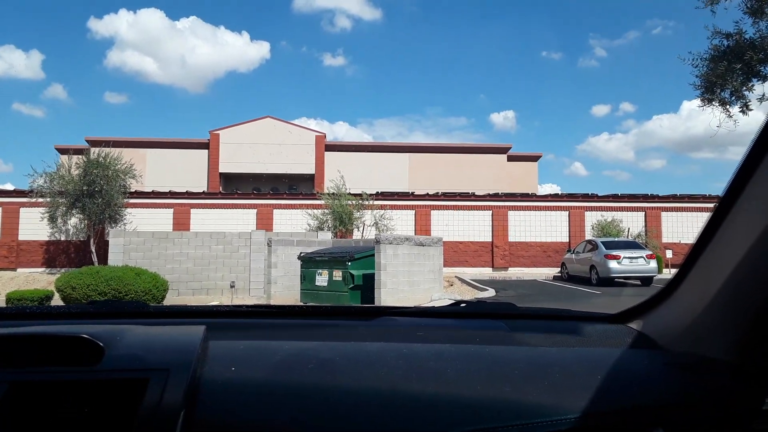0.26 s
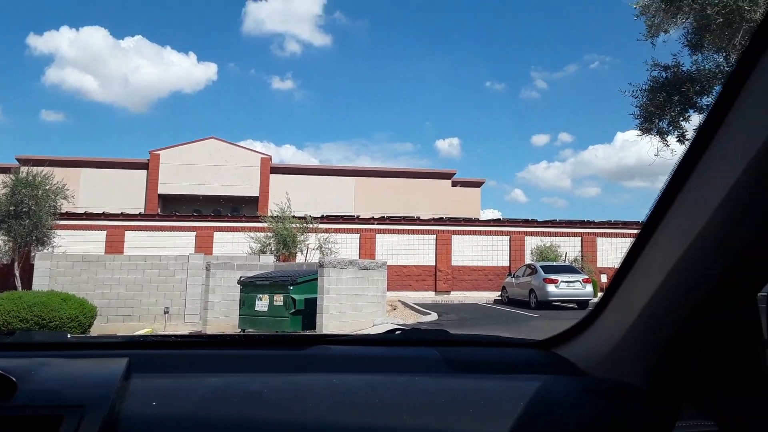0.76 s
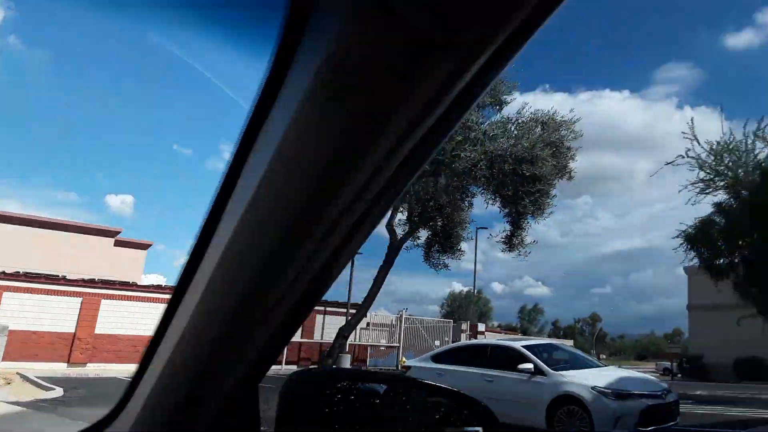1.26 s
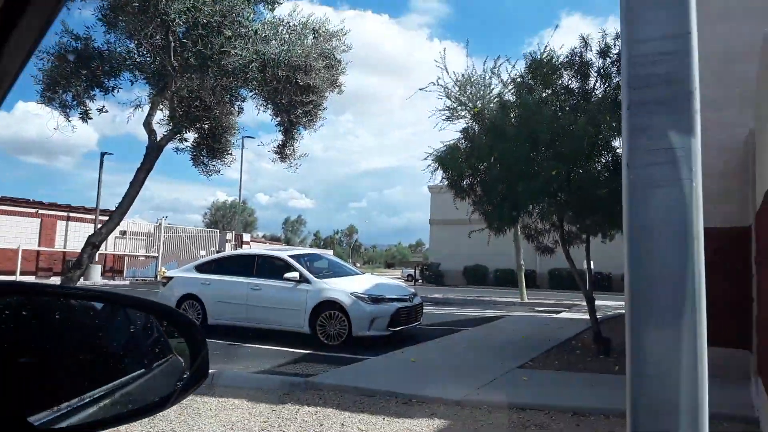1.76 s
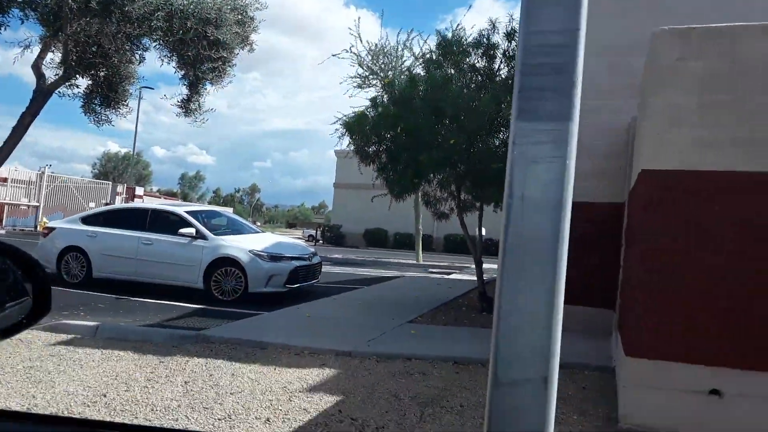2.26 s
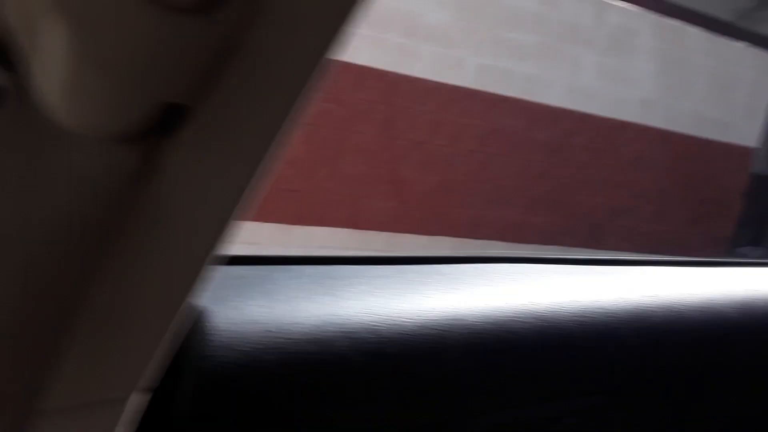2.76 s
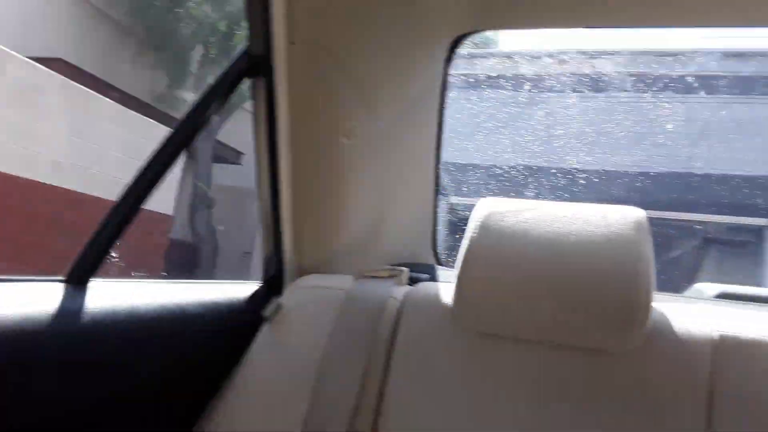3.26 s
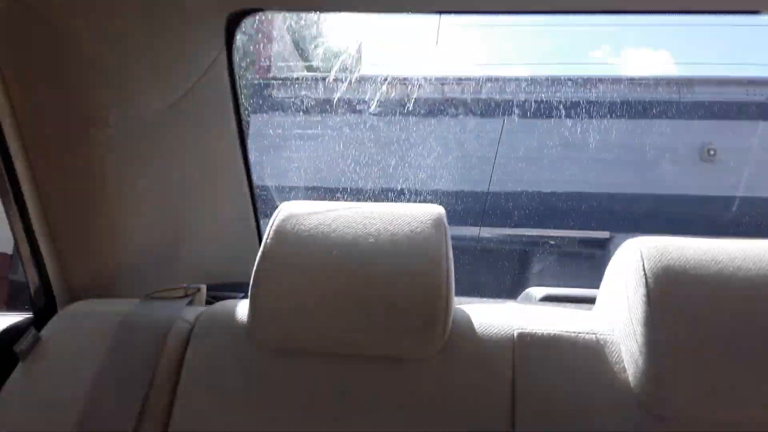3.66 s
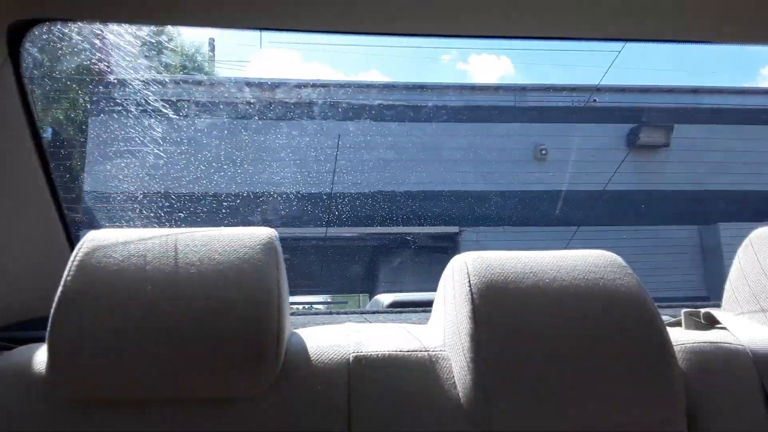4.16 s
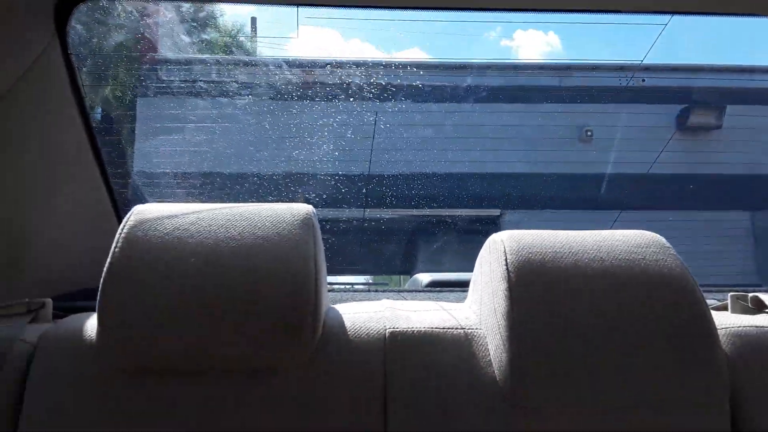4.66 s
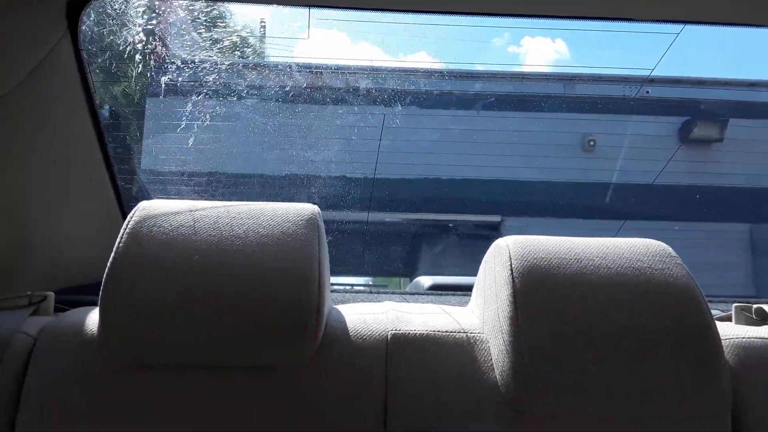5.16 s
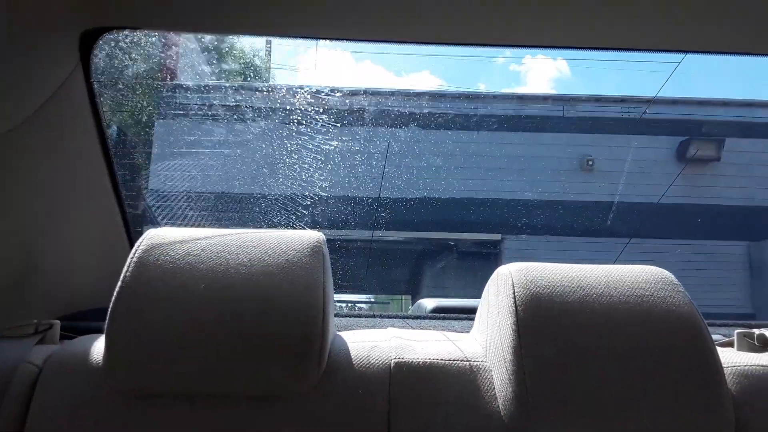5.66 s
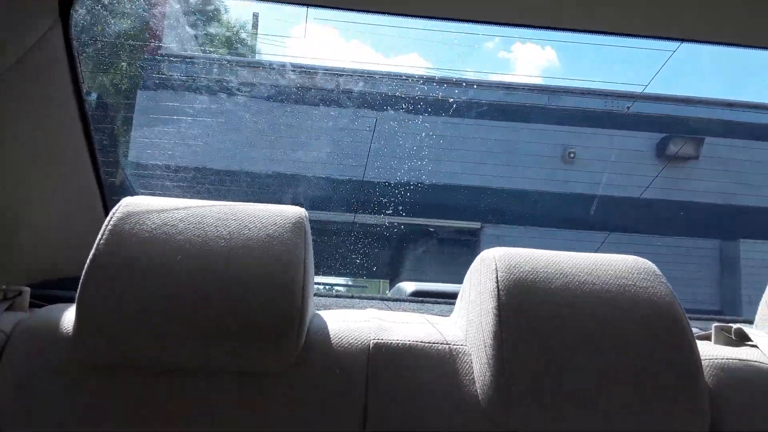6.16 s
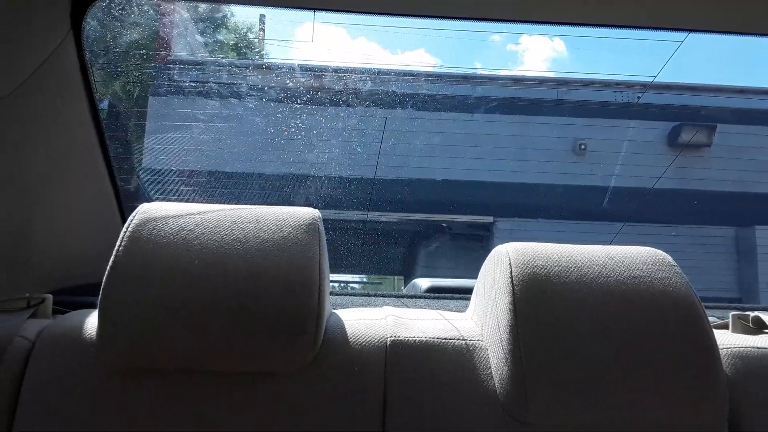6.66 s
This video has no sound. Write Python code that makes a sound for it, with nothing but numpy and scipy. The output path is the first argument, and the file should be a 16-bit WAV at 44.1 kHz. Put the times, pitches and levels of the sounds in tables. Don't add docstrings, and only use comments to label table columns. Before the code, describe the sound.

A steady, loud rushing rumble heard by a stereo phone in a small car cabin. Low air boom wavers irregularly, panels roar and trim buzzes with gusts. Flung water crackles and slaps on glass at first, thinning to stray ticks. The panel roar dips around the middle, then returns with a sharper, ringing airy hiss behind. Near the end the jets fall away, leaving mostly low booming.

```python
import sys
import numpy as np
from scipy import signal
from scipy.fft import rfft, irfft, next_fast_len
from scipy.io import wavfile
from scipy.ndimage import uniform_filter1d, map_coordinates

SR = 44100
rng = np.random.default_rng(int(sys.argv[2]) if len(sys.argv) > 2 else 0)


def dump(signal):
    limited = np.clip(np.atleast_2d(signal).T, -1, 1)
    pcm = np.round(limited * 32767).astype(np.int16)
    wavfile.write(sys.argv[1], SR, pcm)


def gain_from_decibels(decibels):
    exponent = np.asarray(decibels, float) / 20
    return 10 ** exponent


N = 304731

# t/s, level/dB
JET_NEARNESS = [(0, 0), (.75, -1), (1.0, -2.5), (1.4, -2.5), (2.3, -3), (2.8, -2), (3.3, 0), (3.6, -0.5),
                (4.0, -1.5), (4.7, -1.5), (5.2, -3.5), (5.7, -5.5), (6.3, -7), (6.9, -8)]
# t/s, share/0-1
FACING_REAR = [
    (0, 0),
    (1.0, 0),
    (2.2, 0.06),
    (2.47, 0.22),
    (2.62, 0.37),
    (3.0, 0.6),
    (3.6, 0.95),
    (6.91, 0.99),
]
# t/s, level/dB
PRESSURE = [(0, -2), (.3, 0), (.9, -0.5), (1.47, -0.5), (1.58, -5), (1.8, -6), (2.4, -5), (2.6, -5),
            (3.1, -3), (3.5, 0), (4.2, -1), (4.45, -2.5), (5.0, -2.5), (5.5, -3), (6.9, -2.5)]
# t/s, length/s, rise/dB
GUSTS = [(.01, .03, 4.5), (.16, 0.024, 1.5), (.45, 0.074, 1.5), (.64, 0.038, 5), (.71, .04, 4.5),
         (.76, 0.011, -3), (.87, 0.048, -2), (.98, .04, -1), (.27, 0.039, -1), (4.38, 0.046, 0.5),
         (2.36, 0.057, -1), (3.3, .04, 1), (3.7, 0.035, 0.5), (4.25, 0.033, 0), (5.75, .06, 0.5),
         (6.1, .08, 0.5), (6.8, 0.07, -0.5), (1.29, 0.038, -2), (1.06, 0.058, 3), (1.18, 0.076, 4.5),
         (1.43, 0.056, 5.5), (1.64, 0.019, 3.5), (1.95, 0.11, 1.5), (2.14, 0.043, 2), (2.72, 0.14, 3),
         (3.13, 0.031, 0.5), (3.47, 0.046, 1), (3.87, .04, 0), (4.1, .08, 1.5), (4.62, 0.11, 1.5),
         (4.78, 0.039, 1.5), (4.95, 0.088, 1), (5.35, .06, 1), (6.55, 0.14, 1)]
# t/s, left minus right/dB
PANEL_LEAN = [(0.01, 0), (0.72, 0.5), (1.35, -0.5), (6.44, 0.5), (6.9, 0.5)]
# t/s, left minus right/dB
JET_LEAN = [(0, 0.5), (1.6, -1.5), (2.0, -1), (2.5, -2.5), (2.8, 0), (3.3, 0.5), (4.5, -1), (5.2, -1),
            (6.9, -1)]
# f/Hz, facing front/-1..1, facing rear/-1..1
LIKENESS = [(60, 1, 0.98), (110, 0.99, 0.93), (180, 0.93, 0.8), (260, 0.85, 0.83), (447, 0.76, 0.91),
            (597, 0.5, 0.31), (780, 0.68, 0.51), (913, 0.21, -0.23), (1028, -0.18, 0.013),
            (1213, 0.21, -0.63), (1460, -0.1, -0.4), (1650, -0.26, -0.49), (2035, -0.18, 0.14),
            (2400, 0.16, 0.26), (3020, -0.21, -0.32), (3650, 0.035, 0.0042)]

# f/Hz, left level/dB per Hz, right level/dB per Hz
FAINT_HISS = [(7300, -20, -20), (7800, -2, -1), (10000, -2, -6), (13000, 2, 2), (16000, -4, -4)]
# f/Hz, level/dB per Hz
FLOOR_SHAKE = [(15, -20), (25, -15), (40, -8), (52, 3), (65, -9)]
# f/Hz, level/dB per Hz
BOOM_LENGTHWISE = [(35, -36), (48, -35), (60, -1.5), (75, 2.5), (88, 13), (100, -4), (125, -28)]
# f/Hz, level/dB per Hz
BOOM_CROSSWISE = [(70, -53), (90, -27), (103, -4), (120, 3), (132, 0), (150, -38)]
# f/Hz, level/dB per Hz
BOOM_UPRIGHT = [(115, -36), (132, -2), (150, 0.5), (170, -3.5), (190, -7.5), (215, -19.5), (300, -61)]
# t/s, rise/dB
EDDIES_LENGTHWISE = [(.14, 5), (.47, 6), (.95, 10), (1.25, 12.5), (1.9, 5), (2.14, 3), (2.6, 6), (2.9, 9.5),
                     (3.2, 9), (3.5, 8), (3.75, 5), (4.06, 7.5), (4.25, 2.5), (4.6, 8), (5.05, 8.5),
                     (5.2, 5), (5.55, 5), (5.7, 0), (5.9, 8), (6.17, 4), (6.35, 3), (6.76, 6.5)]
# t/s, rise/dB
EDDIES_CROSSWISE = [(.1, 6.1), (.43, 6), (.82, 4.6), (.94, 11.3), (1.2, 7.3), (1.42, 9.4), (1.57, 11),
                    (2.08, 7.1), (2.5, 1.7), (2.87, 3.1), (3.12, 6.3), (3.3, 6.8), (3.58, 6.8), (3.98, 4.5),
                    (4.14, 3), (4.38, 3.5), (4.68, 3.4), (4.92, 7.9), (5.17, 6.2), (5.62, 9.4), (5.77, 1.8),
                    (6.09, 13.5), (6.25, 7.7), (6.47, 4.3), (6.88, 3)]
# t/s, rise/dB
EDDIES_UPRIGHT = [(.02, 3.3), (.2, 2), (.3, 2.3), (.43, 3.5), (3.4, 4.1), (.64, 5.5), (.93, 1.7),
                  (1.13, 6.4), (1.7, 5.4), (1.88, 2.5), (2.1, 6.4), (2.6, 0.92), (2.87, 3.3), (3.25, 3.7),
                  (3.55, 5.2), (3.75, 1.7), (4.15, 7.2), (4.65, 3.7), (4.9, 2.1), (5.1, 5.6), (5.45, 5.4),
                  (5.62, 4), (5.8, 1.3), (6.14, 3), (6.3, 4.8), (6.55, 3.3), (6.88, 1.4)]
# f/Hz, level/dB per Hz
PANE = [(165, -21), (185, 1), (210, -1.5), (240, -3), (275, -7.5), (310, -30)]
# t/s, rise/dB
EDDIES_PANE = [(.07, 9), (.35, 9), (.65, 5), (.95, 0), (1.2, 13), (1.42, 11), (1.6, 4.5), (1.9, 6),
               (2.17, 10.5), (2.35, 4.5), (2.55, 3.5), (2.75, 6.5), (3.2, 7), (3.5, 8), (3.7, 8), (3.95, 7),
               (4.25, 8), (4.45, -0.5), (4.85, 9.5), (5.05, 2), (5.45, 7), (5.8, -5), (6.2, -1), (6.45, -4),
               (6.8, -2)]

# facing front level/dB, facing rear level/dB, growth with pressure/dB per dB, growth with gust/dB per dB
BODY_ANSWER = dict(roar=(-20.5, -20, 1.46, 1), buzz=(-30, -29, 0.94, 1), deep=(-33, -26, 0.4, -0.2),
               lower=(-24.5, -26, 0.5, .5), upper=(-19, -22, 1.05, 0.35))
# f/Hz, level/dB per Hz
ROAR_FRONT = [(170, -43), (212, -13), (262, -1.5), (310, -3.5), (400, -4.5), (500, -9), (560, -61)]
# f/Hz, level/dB per Hz
ROAR_REAR = [(170, -31), (212, -2), (248, -1.5), (320, -4), (430, -5), (500, -10.5), (560, -23.5)]
# f/Hz, level/dB per Hz
BUZZ_FRONT = [(460, -31), (520, 0.4), (640, -4.5), (800, -10), (950, -17), (1200, -33)]
# f/Hz, level/dB per Hz
BUZZ_REAR = [(460, -12), (520, -0.8), (620, -4), (720, -3.5), (900, -13), (1200, -39)]
# t/s, length/s, rise/dB
BUZZ_SURGES = [
    (.7, .08, 1),
    (.9, .06, 2.5),
    (1.7, 0.11, -2),
    (2.2, 0.22, -2),
    (2.9, .08, 1),
    (4.3, .1, -1.5),
    (5.8, 0.067, -0.5),
    (5.98, 0.067, 1),
    (6.4, 0.074, 0),
]

# f/Hz, width/Hz, left level/dB, right level/dB
SEAL_GAPS = [
    (7055, 90, -49, -63),
    (9460, 90, -57, -75),
    (8850, 100, -66, -69),
    (5260, 110, -63, -56),
    (10130, 50, -68, -76),
    (10710, 60, -66, -76),
    (6680, 200, -50, -66),
    (4400, 700, -56, -47),
    (5000, 500, -60, -49),
    (5600, 900, -52, -52),
]
# start t/s, loudest t/s, end t/s
SEAL_PASSES = [
    (2.6, 4.6, 5.6),
    (2, 3.2, 5.4),
    (4.0, 4.9, 5.6),
    (3, 4.4, 6.9),
    (3.2, 4, 5.8),
    (2.9, 4.3, 5.4),
    (3.1, 3.0, 3.4),
    (2.5, 2.7, 3.2),
    (3, 3.4, 3.7),
    (5.4, 5.8, 5.9),
]
# t/s, length/s, fizz level/dB
SPRAY = [(0.017, .02, -51), (.093, .008, -58), (0.12, .008, -58), (0.283, .008, -54), (0.403, .012, -52),
         (0.487, .012, -58), (0.138, 0.022, -58), (0.33, .03, -62), (0.419, 0.022, -46),
         (0.451, 0.014, -42.5), (.478, 0.016, -53), (.512, 0.012, -51), (0.54, .01, -57),
         (0.57, 0.011, -55), (0.615, 0.02, -45), (.652, .015, -58), (0.697, .015, -55), (.722, .012, -50),
         (.77, .01, -60), (0.806, .008, -55), (0.857, 0.01, -58), (0.532, .1, -55), (0.678, .06, -58),
         (.75, .06, -60), (0.903, .012, -54), (1.15, 0.028, -52), (1.225, .012, -57), (1.33, .01, -58),
         (1.416, .03, -62), (1.09, .015, -58), (1.48, .01, -57), (1.535, .006, -57), (1.62, .006, -57),
         (1.757, .006, -54), (1.81, .006, -57), (1.96, .015, -58), (2.303, .006, -54), (2.355, .006, -58),
         (3.015, .006, -52), (3.48, .006, -52), (5.088, .006, -54), (5.815, .006, -56), (2.907, .015, -48),
         (4.264, .015, -48)]
# f/Hz, left level/dB per Hz, right level/dB per Hz
SPRAY_FIZZ = [(2500, -30, -31), (3500, -10, -5), (5000, -13, -4), (7000, 0.5, -13), (8000, -10, -9),
              (10100, -13, -13), (11300, -3, -5), (12700, 0, 0), (14000, -7, -8), (15700, -12, -12),
              (16500, -30, -30)]
# f/Hz, level/dB per Hz
SPRAY_SLAP = [(700, -21), (1050, 15), (1500, 1), (2200, -14), (3000, -16), (4000, -31)]

# facing front level/dB, facing rear level/dB,
# front growth with nearness/dB per dB, rear growth/dB per dB, power bending the turn
JET_ANSWER = dict(rush=(-41.5, -37.5, 1.1, 0.27, 0.85), hiss=(-45.5, -42, 0.94, 0.42, 3),
              fizz=(-61, -46, 1, 1.56, 0.23), ring=(-60.5, -47, -0.8, 1.08, 0.26))
# f/Hz, left level/dB per Hz, right level/dB per Hz
HISS_FRONT = [(760, -31, -37), (1013, 6.5, 1), (1310, -1, 0), (1960, -1, -2), (2720, -6, -9.5),
              (3160, -8, -13), (3640, -4, -13), (4520, -6, -11.5), (4940, -12.5, -15), (5760, -19.5, -21.5),
              (6400, -30, -21)]
# f/Hz, left level/dB per Hz, right level/dB per Hz
HISS_REAR = [(860, 0, 5), (1020, 8.5, 8), (1410, 5, 3), (2040, -3, -3), (2700, -5, -1.5), (3240, -5, -5),
             (3670, -1, -5), (4170, -0.5, -5.5), (4700, -4, -5), (5300, -6.5, -6), (5630, -6, -15),
             (6440, -12.5, -13)]
# f/Hz, left level/dB per Hz, right level/dB per Hz
RING_FRONT = [(5730, -32, -23), (6000, -7.5, -17), (6400, -3, -14), (6830, 4.5, -12), (7370, -3, -3),
              (7630, -22, -11), (7900, -48, -40)]
# f/Hz, left level/dB per Hz, right level/dB per Hz
RING_REAR = [(5700, -24, -20), (6030, -14, -9), (6420, -2, -15), (7100, 5, -10), (7350, -1, -8),
             (7560, -5, -6), (7630, -16, -13), (7900, -40, -40)]
# f/Hz, left level/dB per Hz, right level/dB per Hz
FIZZ_FRONT = [(7400, -30, -30), (7800, -13, -0.5), (8700, -3.5, -4), (10000, -9.5, -10), (11500, -2, -4),
              (12600, 0.5, 0), (14000, -7, -8), (15700, -11, -11), (16500, -30, -30)]
# f/Hz, left level/dB per Hz, right level/dB per Hz
FIZZ_REAR = [(7400, -30, -30), (7800, -6, -4), (8300, -3.5, -3), (8800, -2, -6), (9400, -4, -3.5),
             (10300, -2, -10), (11500, -1, -5.5), (13200, 2, -5), (14500, -5, -11), (15700, -8, -17),
             (16500, -30, -27)]
# t/s, length/s, rise/dB
WATER_SHEETS = [
    (.06, 0.023, 1),
    (.12, .03, 2.5),
    (.32, .03, 1),
    (.415, 0.017, 7),
    (.452, 0.011, 3),
    (.478, .018, 4.5),
    (.78, 0.011, 3.5),
    (.86, .015, 2),
    (.62, 0.026, 0),
    (.74, 0.044, 0.5),
]
# t/s, length/s, rise/dB
HISS_SWELLS = [
    (2.66, .1, 1.5),
    (2.95, 0.15, 3),
    (4.2, .15, 1.5),
    (3.5, .2, -1),
    (4.55, 0.17, 1.5),
    (5.1, 0.14, 0.5),
    (5.6, .12, 0.5),
    (5.95, 0.3, 2),
]
# t/s, length/s, rise/dB
RING_BURSTS = [(2.79, 0.049, 3), (3.0, 0.082, 6), (3.15, 0.075, 2), (3.27, 0.046, 4.5), (3.42, .05, 3.5),
               (3.55, .06, 4), (4.5, 0.073, 0.5), (4.9, 0.089, 2), (3.85, .08, 0.5), (5.15, .08, -0.5),
               (5.75, .1, 1), (6.1, .1, 1.5)]
# t/s, length/s, rise/dB
FIZZ_LULLS = [
    (.2, .12, 0),
    (.37, .03, -1.5),
    (1.0, .06, -2),
    (1.28, .04, 0),
    (2.4, .2, -1.5),
    (2.68, .1, 0.5),
    (3.9, .15, 0.5),
    (4.8, .2, 0),
    (6.1, .25, -0.5),
    (6.6, .2, 0),
]


def unit(x):
    return x / np.sqrt(np.mean(x ** 2) + 1e-20)


def along(points, hz):
    f, *columns = np.transpose(points)
    return np.array([np.interp(np.log(hz + 1), np.log(f + 1), column) for column in columns])


def table(points):
    return lambda hz: gain_from_decibels(along(points, hz)) * (hz >= points[0][0]) * (hz <= points[-1][0])


def curves(rows):
    s, *columns = np.transpose(rows)
    return [np.interp(np.arange(N) / SR, s, column) for column in columns]


def swells(rows, length=None):
    s, *span, rise_db = np.transpose(rows)[..., None].astype(np.float32)
    t = np.arange(0, N + 64, 64, dtype=np.float32) / SR
    bells = np.exp(-((t - s) / (length or span[0])) ** 2)
    coarse = (rise_db * bells).sum(axis=0)
    return np.interp(np.arange(N) / SR, t, coarse)


def wobble(rate, count=N, step=1 / SR, order=3):
    knots = rng.standard_normal(int(count * step * rate) + 4)
    return map_coordinates(knots, [np.arange(count) * step * rate], order=order)


def rush(gain, pose=0, patchy_db=1.5, echo=0.092, comb_db=0.0):
    z = signal.stft(rng.standard_normal((2, N)).astype(np.float32), nperseg=512)[2]
    patches = uniform_filter1d(rng.standard_normal(z.shape[1:]), size=6, axis=0)
    patches = uniform_filter1d(patches, size=12, axis=1)
    pair = signal.istft(z * gain_from_decibels(patchy_db * unit(patches)), nperseg=512)[1][:, :N]

    m = next_fast_len(N + SR // 4)
    hz = np.fft.rfftfreq(m, 1 / SR)
    ripple = np.array([wobble(1 / 130, count=len(hz), step=hz[1], order=1) for _ in range(4)])
    ripple = ripple * np.minimum(hz / 2200, 1) ** 2
    alike = along(LIKENESS, hz)[pose] + echo * (ripple[0] + 1j * ripple[1])

    angle = np.arccos(np.clip(np.abs(alike), 0, 1)) / 2
    mid, side = rfft(pair, m) * [np.cos(angle), np.sin(angle)]
    ports = np.array([mid + side, (mid - side) * np.exp(1j * np.angle(alike))])
    return unit(irfft(ports * gain(hz) * gain_from_decibels(comb_db * ripple[2:]), m)[:, :N])


def turning(front, rear, patchy_db):
    share = np.clip(curves(FACING_REAR)[0], 0, 1)
    ahead = rush(table(front), pose=0, patchy_db=patchy_db, echo=0.086, comb_db=1.6)
    behind = rush(table(rear), pose=1, patchy_db=patchy_db, echo=0.2, comb_db=1.0)
    return np.sqrt(1 - share) * ahead + np.sqrt(share) * behind


def steady(x, span, depth):
    power = np.abs(uniform_filter1d(np.mean(x ** 2, axis=0), size=int(span * SR))) + 0.05
    return unit(x / power ** (depth / 2))


def body_db(part):
    front_db, rear_db, per_pressure, per_gust = BODY_ANSWER[part]
    pose_db = front_db + (rear_db - front_db) * curves(FACING_REAR)[0]
    return pose_db + per_pressure * curves(PRESSURE)[0] + per_gust * swells(GUSTS)


def jet_db(part):
    front_db, rear_db, front_grows, rear_grows, power = JET_ANSWER[part]
    turn = np.clip(curves(FACING_REAR)[0], 0, 1) ** power
    near_db = curves(JET_NEARNESS)[0]
    return (1 - turn) * (front_db + front_grows * near_db) + turn * (rear_db + rear_grows * near_db)


def faint_hiss():
    return gain_from_decibels(-60) * rush(table(FAINT_HISS), patchy_db=0.0)


def floor_shake():
    return gain_from_decibels(-45) * rush(table(FLOOR_SHAKE), pose=0, patchy_db=1)


def cabin_boom():
    deep_db = body_db("deep") + swells(EDDIES_LENGTHWISE, length=0.09)
    lower_db = body_db("lower") + swells(EDDIES_CROSSWISE, length=0.06)
    upper_db = body_db("upper") + swells(EDDIES_UPRIGHT, length=0.049)
    deep = steady(rush(table(BOOM_LENGTHWISE), pose=1, patchy_db=1.0), span=0.11, depth=1.0)
    lower = steady(rush(table(BOOM_CROSSWISE), pose=0, patchy_db=-1.5), span=0.072, depth=0.58)
    upper = steady(rush(table(BOOM_UPRIGHT), pose=0, patchy_db=-1.0), span=0.091, depth=0.41)
    return gain_from_decibels(deep_db - 1.9) * deep + gain_from_decibels(lower_db - 0.8) * lower + gain_from_decibels(upper_db + 0.15) * upper


def side_window():
    level_db = -33 + swells(EDDIES_PANE, length=0.12) + 0.25 * swells(GUSTS)
    return gain_from_decibels(level_db) * steady(rush(table(PANE), pose=0, patchy_db=0.5), span=0.09, depth=0.95)


def panels():
    roar_db = body_db("roar") + 0.54
    buzz_db = body_db("buzz") + swells(BUZZ_SURGES) + 1.2
    roar = steady(turning(ROAR_FRONT, ROAR_REAR, patchy_db=0.2), span=0.1, depth=1.0)
    buzz = steady(turning(BUZZ_FRONT, BUZZ_REAR, patchy_db=1.1), span=0.14, depth=1.0)
    return gain_from_decibels(roar_db) * roar + gain_from_decibels(buzz_db) * buzz


def whistles():
    t = np.arange(N) / SR
    out = 0
    for (centre_hz, width_hz, left_db, right_db), (start, top, end) in zip(SEAL_GAPS, SEAL_PASSES):
        swell = np.sqrt(np.interp(t, [start, top, end], [0, 1, 0]))
        tone = rush(lambda hz: 1 / (1 + (2 * (hz - centre_hz) / width_hz) ** 2), pose=1, echo=0.35)
        out = out + gain_from_decibels([[left_db], [right_db]]) * swell * gain_from_decibels(1.1 * wobble(12)) * tone
    return out


def spray():
    s, length, fizz_db = np.transpose(SPRAY)[..., None]
    late = (np.arange(N) / SR - s) / length
    throws = np.exp(-np.where(late < 0, late / 0.45, late) ** 2)
    ticks = unit(gain_from_decibels(2.4 * wobble(450)))
    fizz = gain_from_decibels(fizz_db + 4.5).T @ throws * rush(table(SPRAY_FIZZ), pose=0, patchy_db=1.2)
    slap = gain_from_decibels(fizz_db + 8.5).T @ throws * rush(table(SPRAY_SLAP), pose=0, patchy_db=1.5)
    return ticks * (fizz + slap)


def jets():
    rush_db = jet_db("rush") + 0.076 * swells(GUSTS) + swells(WATER_SHEETS) + 4.5
    hiss_db = jet_db("hiss") + swells(HISS_SWELLS) + 3.5
    fizz_db = jet_db("fizz") + swells(FIZZ_LULLS) + 2.5
    ring_db = jet_db("ring") + swells(RING_BURSTS) + 3.5
    flutter = wobble(6.7)

    m = next_fast_len(N)
    body = turning(HISS_FRONT, HISS_REAR, patchy_db=0.5)
    low = irfft(rfft(body, m) * (np.fft.rfftfreq(m, 1 / SR) < 3000), m)[:, :N]
    hiss = gain_from_decibels(rush_db) * unit(low) + gain_from_decibels(hiss_db + 0.23 * flutter) * unit(body - low)

    fizz_flutter_db = 0.31 * flutter + 0.48 * wobble(30)
    fizz = gain_from_decibels(fizz_db + fizz_flutter_db) * turning(FIZZ_FRONT, FIZZ_REAR, patchy_db=1.1)
    ring = gain_from_decibels(ring_db + 0.5 * flutter) * turning(RING_FRONT, RING_REAR, patchy_db=1.5)
    return hiss + fizz + ring


def scene():
    panel_lean_db = curves(PANEL_LEAN)[0] / 2
    jet_lean_db = curves(JET_LEAN)[0] / 2
    body = floor_shake() + cabin_boom() + side_window() + panels()
    body = body * gain_from_decibels([panel_lean_db, -panel_lean_db])
    air = whistles() + spray() + jets() * gain_from_decibels([jet_lean_db, -jet_lean_db])
    return faint_hiss() + body + air


def band_limit(x):
    return signal.sosfilt(signal.butter(12, 15790, fs=SR, output="sos"), x)


def record(dry):
    soft = dry / (1 + np.abs(dry / 1.03) ** 8) ** (1 / 8)
    return band_limit(soft)


dry = scene()
out = record(dry)
dump(out)
```